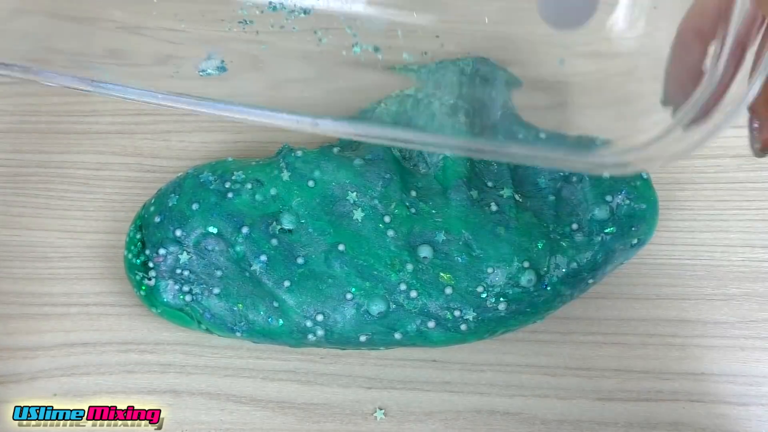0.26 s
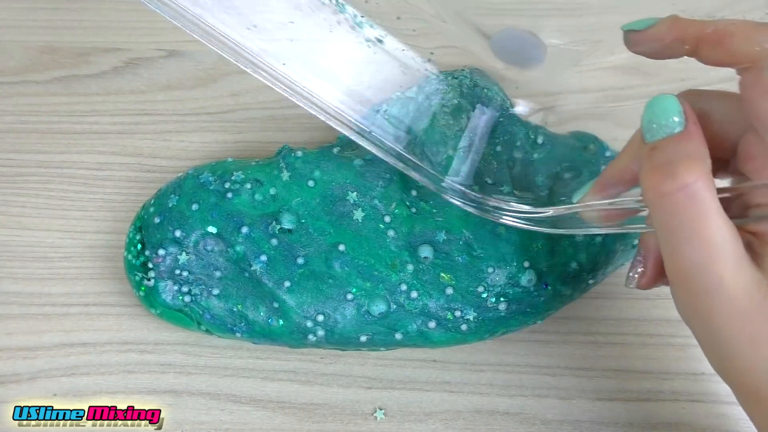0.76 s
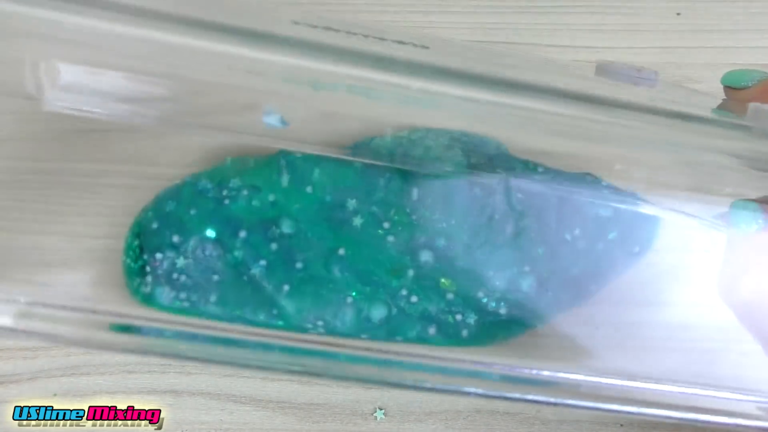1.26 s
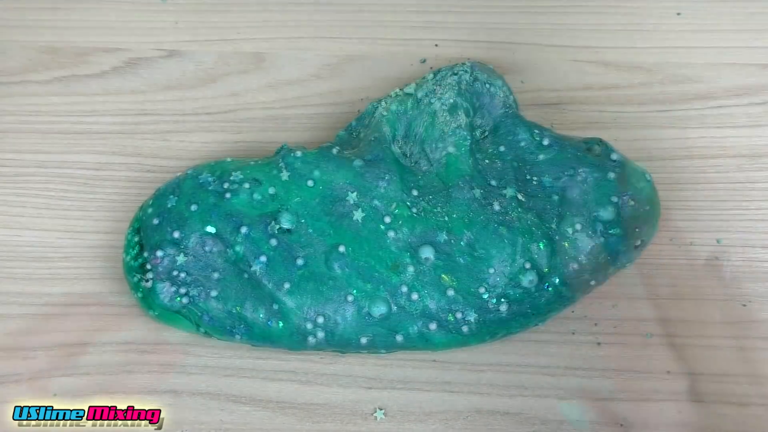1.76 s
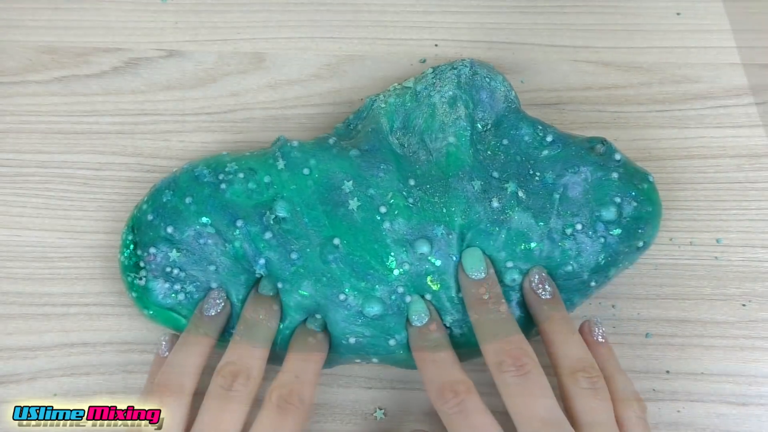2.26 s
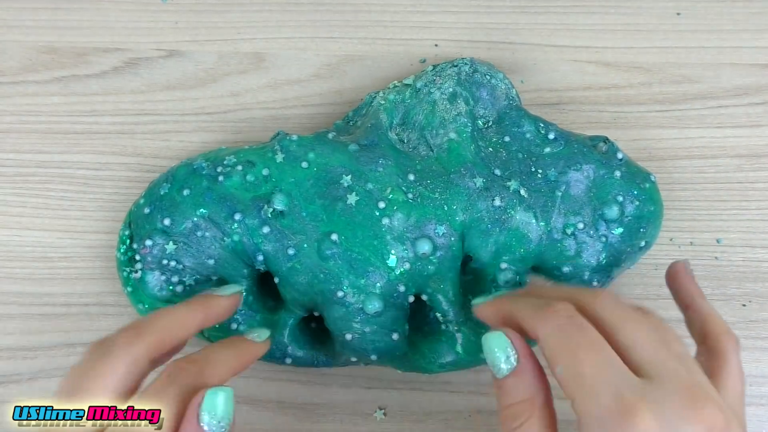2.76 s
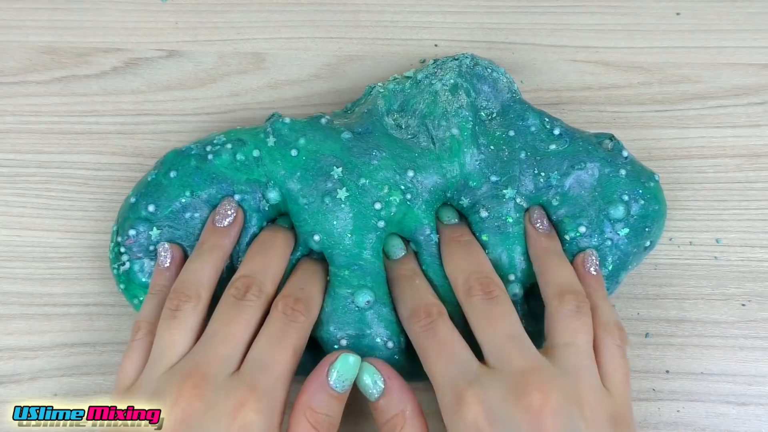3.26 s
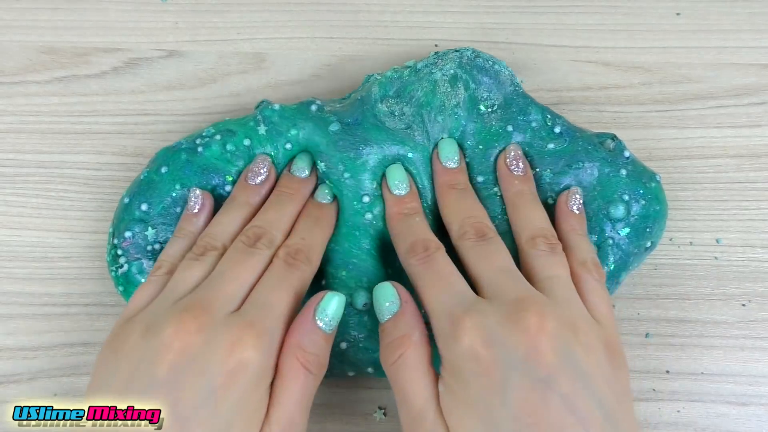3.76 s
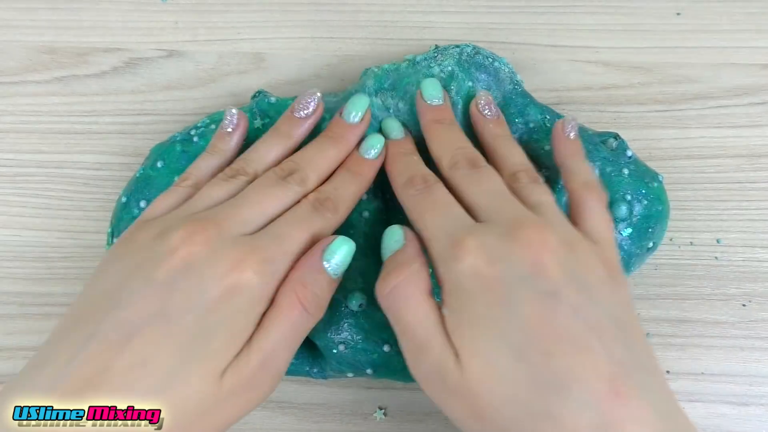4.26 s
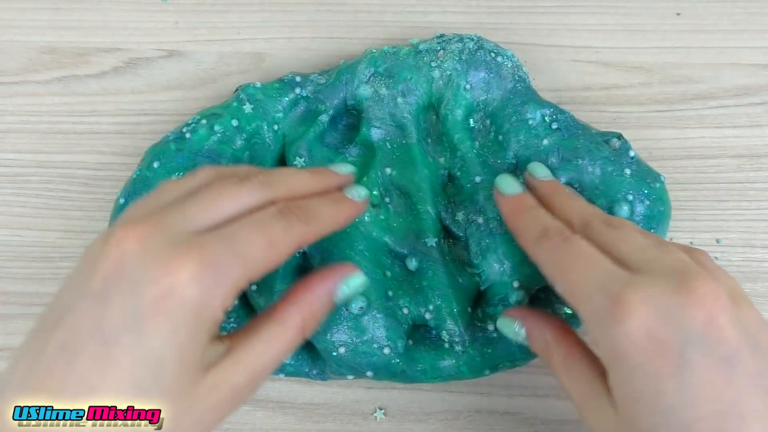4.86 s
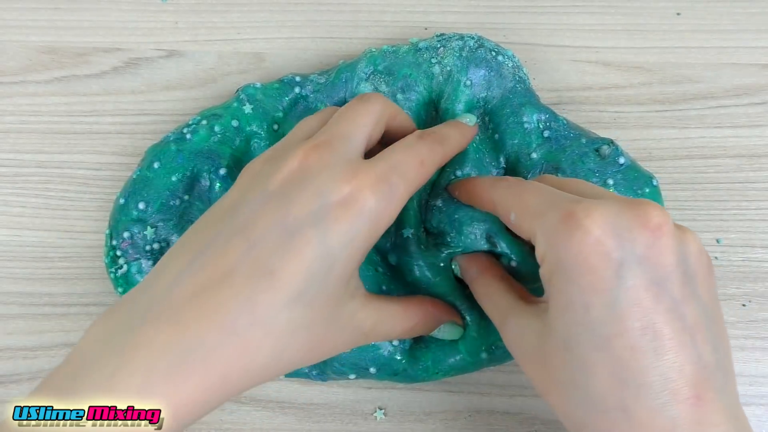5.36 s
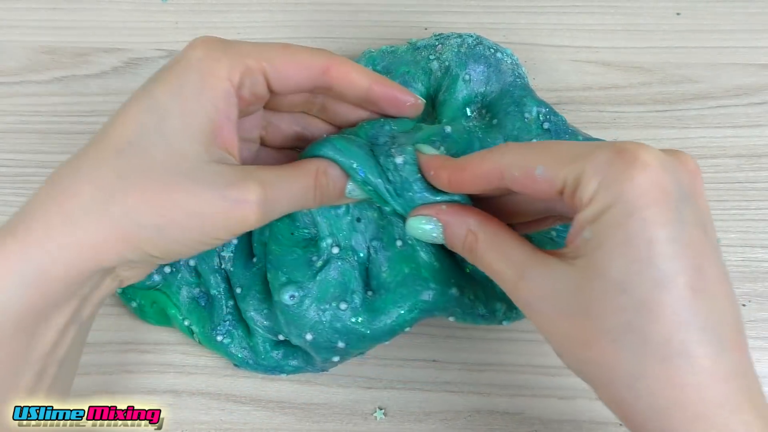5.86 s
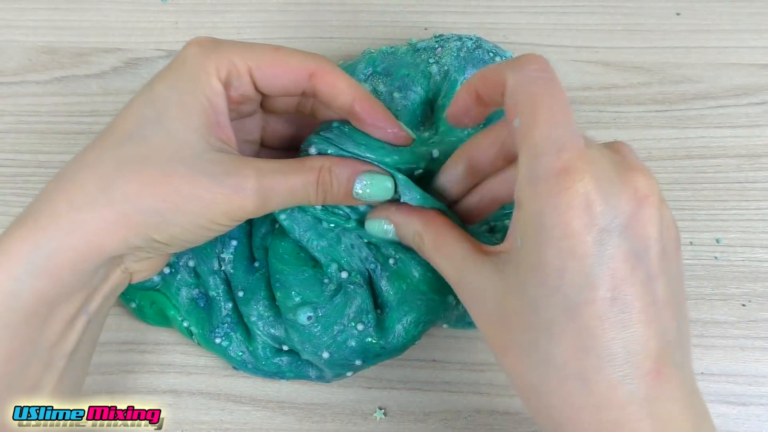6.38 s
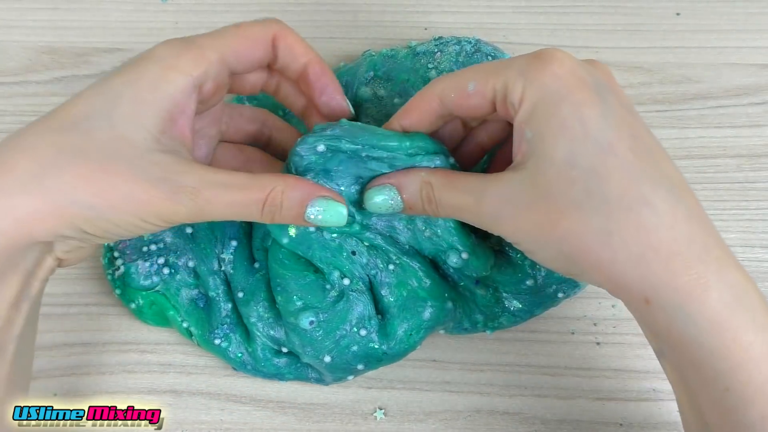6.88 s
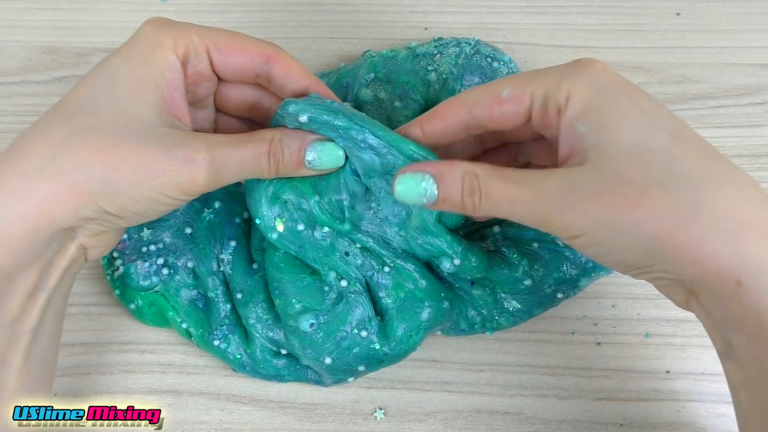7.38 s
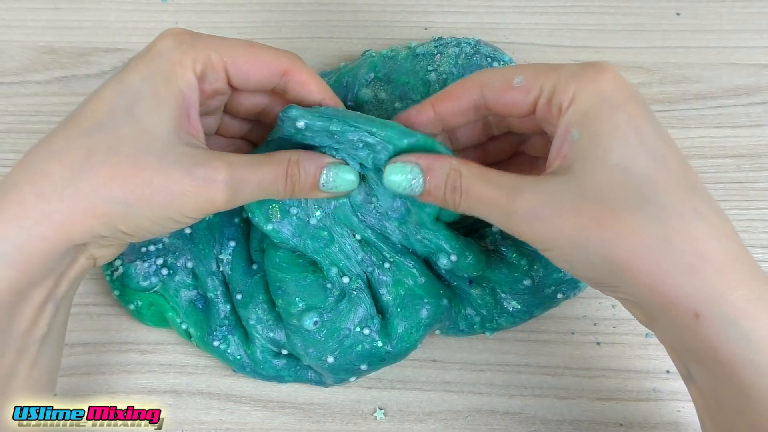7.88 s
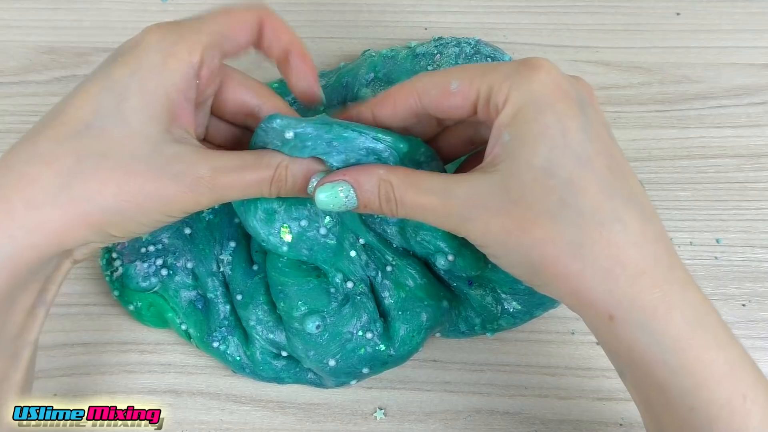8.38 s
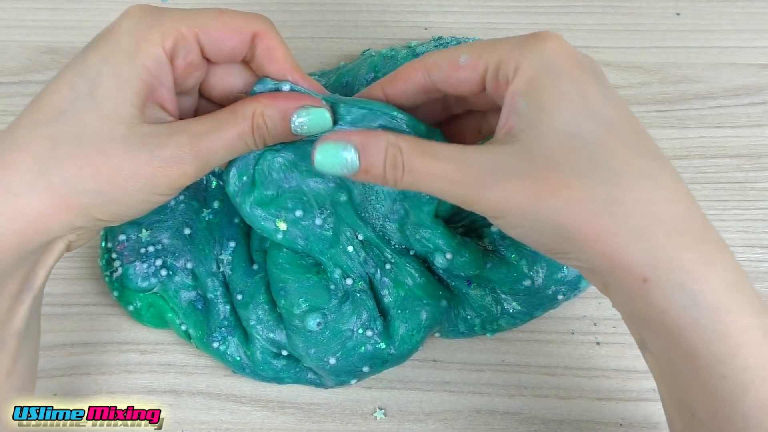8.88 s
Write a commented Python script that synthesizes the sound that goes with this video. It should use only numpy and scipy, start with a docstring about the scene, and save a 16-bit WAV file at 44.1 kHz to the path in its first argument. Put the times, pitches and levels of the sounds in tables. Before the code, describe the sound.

Close to a stereo microphone in a small quiet room, two hands knead slime on a wooden table. After an opening pop and soft knock, a glass dish is tapped in two short ringing clusters. Then come uneven bursts of high, snapping air bubbles, quiet wet squelches and sticky crackles, with dull table bumps beneath that thin out toward the end. Faint hiss and a low hum lie underneath.

```python
"""A small quiet room, where two hands knead sticky slime on a wooden table close to a stereo microphone.
A tapped glass dish rings in its normal modes. As fingers press in and peel out, air pockets burst and
resonate, the sticky skin crackles as it lets go, and a closing cavity gurgles with falling pitch.
The table top thuds under the blows and sways under the pushes. Room hiss and a hum lie below."""
import sys
import numpy as np
from scipy import signal
from scipy.io import wavfile

SR = 44100
rng = np.random.default_rng(int(sys.argv[2]) if len(sys.argv) > 2 else 0)


def generate_wav(signal):
    """Clip the signal to [-1, 1] and save it as 16-bit WAV at the path in sys.argv[1]."""
    frames = np.transpose(np.atleast_2d(signal))
    scaled = np.clip(frames, -1, 1) * 32767
    pcm = np.round(scaled).astype(np.int16)
    wavfile.write(sys.argv[1], SR, pcm)


N = 402633

# spectrum of the hiss: f/Hz, relative spectral level/dB
HISS_SPECTRUM = [(15, -36), (25, -3.5), (149, -0.5), (206, -7.5), (344, 0.5), (607, -21), (714, -14),
                 (1190, -9), (1560, -8), (1840, -10.5), (2840, -11.5), (6050, -26), (10400, -20.5),
                 (13200, -19), (16000, -26)]
# likeness of the hiss at left and right: f/Hz, correlation/1
HISS_CORRELATION = [(30, 0.59), (250, 0.82), (1000, 0.19), (6000, 0.44), (14000, 0.96)]
# envelope of the hum: t/s, level/dB
HUM_ENVELOPE = [(0.0, -62.5), (0.46, -71), (3.38, -71.5), (3.58, -62), (3.79, -74.5), (9.13, -83)]
# bursting air pockets: t/s, level/dB, nominal f/Hz, ring length/cycles, snap re ring/dB
AIR_POCKETS = [(0.0004, -19.5, 3500, 1.4, -13), (0.0571, -21.5, 11700, 2.9, -20),
               (0.205, -50.5, 4200, 1.5, -8), (1.5636, -45, 14200, 7.5, -8),
               (2.3932, -34.5, 10400, 2.5, -21), (2.4596, -43.5, 8660, 2.4, -8),
               (2.4747, -40, 7900, 2, -13), (2.5643, -21.5, 4770, 1.16, -12), (2.7791, -27, 5440, 1.6, -10),
               (2.797, -30, 10800, 4.4, -14), (2.8045, -24.5, 4000, 2.8, -17),
               (2.8123, -28, 3500, 2.7, -18), (2.8545, -17, 9700, 2.4, -4.5),
               (3.0552, -52.5, 2230, 3.2, -12), (3.142, -47.5, 6000, 1.4, -10),
               (3.2263, -44, 3900, 4.4, 16), (3.261, -41.5, 11750, 2.8, 5), (3.2848, -38.5, 11990, 1.8, -5),
               (3.349, -32, 10600, 2.3, -15), (3.519, -12, 7900, 1.25, -16), (3.5421, -33, 9500, 2.1, -9),
               (3.5599, -26.5, 11400, 3, 3), (3.7345, -40.5, 10870, 1.4, -2),
               (3.8425, -26.5, 13300, 2.4, -1.5), (4.1651, -19.5, 10700, 2.2, -3),
               (4.1821, -16.5, 9400, 2.7, -6.5), (4.437, -37.5, 2850, 1.6, -10),
               (4.5762, -33, 1420, 1.3, 14.5), (4.7644, -40, 9950, 3.5, 9), (4.8231, -22.5, 7730, 2.5, -13),
               (5.219, -34, 13000, 2.7, -14), (5.2353, -21, 10760, 10, -33), (5.3033, -37, 11710, 2.1, -4),
               (5.522, -40.5, 3490, 2.5, -14), (5.5453, -46.5, 3500, 4.5, -4),
               (5.6153, -37.5, 9900, 2.5, 8.5), (5.6335, -35, 9000, 3.7, -7),
               (5.673, -16.5, 11040, 90, -17), (5.772, -40.5, 3860, 5.8, 15),
               (5.8094, -27.5, 2530, 0.75, -10.5), (6.022, -48, 1640, 5.4, -15),
               (6.0344, -35.5, 2730, 5.9, -21), (6.035, -38, 1700, 4.4, -18), (6.0356, -9, 10100, 4.7, -18),
               (6.1609, -45, 2340, 2.3, 3), (6.3028, -43, 3560, 2, 0), (6.3356, -29, 9400, 1.26, 0.5),
               (6.4836, -32.5, 4220, 0.88, -12), (6.531, -36.5, 4430, 0.93, 4),
               (6.803, -44.5, 2500, 2.5, 12), (7.084, -44.5, 6000, 1.2, -8), (7.1463, -45, 2400, 1.5, 10.5),
               (7.275, -45, 8480, 1.6, 4), (7.576, -51.5, 2160, 1.8, 14), (8.4168, -41.5, 9010, 2.3, 2),
               (8.556, -35, 3370, 1.3, -4), (8.7368, -44, 3320, 2.5, 17.5), (8.749, -44, 4500, 1.3, 2),
               (8.8783, -24.5, 9840, 1.3, 6), (8.9106, -20, 6070, 1.6, -18), (8.957, -18, 6100, 1.76, -7.5)]
# skin peeling off fingers and table: loudest t/s, level/dB, swell/s, fade/s, fizz re squelch/dB
SKIN_PEELS = [(0.003, -52, 0.011, 0.16, -10.5), (2.47, -77, .1, 0.06, 1), (2.778, -55, 0.01, 0.042, 11.5),
              (2.812, -45, 0.045, 0.065, -4), (3.25, -68, .2, 0.28, -6.5), (3.506, -52.5, 0.012, .04, 3.5),
              (3.54, -46, 0.048, .09, -4.5), (3.86, -71, 0.058, 0.95, -1),
              (4.188, -46.5, 0.054, 0.068, -2.5), (4.574, -68.5, .005, 0.2, -7),
              (4.77, -54.5, 0.054, 0.045, 2), (4.828, -63, .06, 0.064, 4),
              (5.134, -70.5, 0.054, 0.062, -3.5), (5.3, -67, 0.18, 0.36, -7), (5.52, -70, 0.1, .09, -23),
              (5.68, -54.5, .1, 0.1, -3.5), (5.87, -55, 0.28, 0.34, -2.5), (6.488, -58.5, 0.095, 0.078, 1),
              (6.809, -55, 0.024, 0.099, -5), (6.927, -56.5, 0.038, 0.08, -7),
              (7.333, -62.5, 0.13, 0.041, -1.5), (7.597, -58.5, .03, 0.017, -1),
              (7.985, -70, 0.047, 0.077, 5.5), (8.578, -60.5, 0.071, 0.11, -1.5),
              (8.895, -59.5, 0.05, 0.029, 2)]
# slime slapping and pulling the table top: t/s, deep-mode level/dB, upper-mode level/dB
TABLE_BLOWS = [(.002, -49.5, -52), (0.827, -74, -55), (2.343, -79, -53), (2.376, -85, -62),
               (2.566, -93, -56.5), (2.779, -61, -53.5), (2.803, -38, -46.5), (2.862, -60, -49.5),
               (3.521, -47.5, -44.5), (3.545, -53, -46.5), (3.575, -48, -48.5), (4.183, -54, -45),
               (4.21, -51, -47.5), (4.576, -83, -59.5), (4.809, -52.5, -51.5), (4.87, -58, -62.5),
               (5.119, -54.5, -72), (6.067, -57.5, -79), (6.494, -69, -69), (6.993, -58, -52.5)]
# normal modes of the table top: f/Hz, relative level/dB, T60/s
TABLE_MODES = [(119, -4, .17), (80, -8, .1), (210, -14, .06), (297, 3, .1), (345, 0, .08), (400, -4, .07),
               (490, -7, .06), (720, -14, .04), (1100, -15, .03)]
# taps on the glass dish: t/s, level/dB, hardness as spectral slope/(dB per octave)
DISH_TAPS = [(0.8016, -42.5, -3.5), (0.816, -44.5, -7), (0.8277, -31, -3), (1.7368, -44, -10.5),
             (1.8488, -25.5, -5), (1.8945, -26.5, 6), (1.906, -19.5, 1)]
# normal modes of the dish: f/Hz, relative level/dB
DISH_MODES = [(1367, -11), (1800, -17), (1916, -15), (2273, -10), (2520, -11), (2790, -14), (3035, -9),
              (3144, -9), (3250, -12), (3537, -9), (3878, -3), (4194, -8), (4307, -11), (4474, -10),
              (4678, -8), (4867, -14), (5490, -14), (6205, -7), (6334, -6), (6410, -6), (7068, -14),
              (7284, -9), (7499, -7), (7650, -10), (7883, -8), (8371, -9), (8599, -4), (8690, -7),
              (8772, -7), (9598, -16), (10230, -16), (11200, -15), (11500, -14)]
# pushes that rock the table: strongest t/s, level/dB, swell/s
TABLE_PUSHES = [(2.38, -53, 0.17), (2.89, -66, 0.11), (3.35, -63, 0.2), (3.89, -61, .19),
                (4.41, -64.5, 0.17), (4.9, -58, 0.14), (6.4, -68, 0.086)]
# reverberation of the room: f/Hz, T60/s, tail level re direct sound/dB
ROOM_DECAY = [(291, .2, 15.5), (1550, 0.25, 2), (4000, 0.19, 3.5), (9430, 0.21, 0.5), (13900, 0.26, -1.5)]

LEFT_RIGHT = np.array([[1], [-1]])   # opposite signs for the two channels


def from_db(db):
    """Amplitude ratio of a level in decibels."""
    return 10 ** (np.asarray(db) / 20)


def unit_rms(x):
    """Normalisation to an rms of 1."""
    return x / np.sqrt(np.mean(x ** 2) + 1e-20)


def at_hz(spectrum, hz, column=1):
    """Interpolation of a table column on a logarithmic frequency axis."""
    rows = np.array(spectrum)
    return np.interp(np.log(hz), np.log(rows[:, 0]), rows[:, column])


def band(x, low_hz, high_hz):
    """Butterworth band-pass filter."""
    sos = signal.butter(2, [low_hz, min(high_hz, .45 * SR)], "band", fs=SR, output="sos")
    return signal.sosfilt(sos, x)


def resonance(x, hz, width_hz):
    """Forced response of a resonator with a peak gain of 1."""
    r = np.exp(-np.pi * width_hz / SR)
    feedback = [1, -2 * r * np.cos(2 * np.pi * hz / SR), r * r]
    return signal.lfilter([(1 - r * r) / 2, 0, (r * r - 1) / 2], feedback, x)


def ring(impulses, hz, t60):
    """Free vibration of a damped mode: a unit impulse starts a decaying sine of amplitude 1."""
    r, w = 10 ** (-3 / (t60 * SR)), 2 * np.pi * hz / SR
    return signal.lfilter([0, np.sin(w)], [1, -2 * r * np.cos(w), r * r], impulses + 1e-18)


def drift(per_s):
    """Slow random modulation: straight lines between standard normal values."""
    knots = rng.standard_normal(int(N / SR * 60) + 2)
    return np.interp(np.arange(N) * per_s / SR, np.arange(len(knots)), knots)


def stereo(mid, side, correlation):
    """Sum and difference of two independent signals give partly correlated channels."""
    return (np.sqrt(1 + correlation) * mid + np.sqrt(1 - correlation) * side * LEFT_RIGHT) / np.sqrt(2)


def hump(peak_s, db, swell_s, fade_s, roundness, edge_db=20):
    """Envelope, edge_db down at swell_s before and fade_s after its peak; roundness 1 is a cusp, 2 a bell."""
    t = np.arange(N) / SR - peak_s
    distance = np.abs(t / np.where(t < 0, swell_s, fade_s))
    return from_db(db - edge_db * distance ** roundness)


def hiss():
    """Partly coherent broadband noise, whose level flickers slightly in each band."""
    out, white = 0, rng.standard_normal((2, 2, N))
    edges = 22 * 2 ** np.arange(0, 9.9, .45)
    for k, (low, high) in enumerate(zip(edges, edges[1:])):
        hz = np.sqrt(low * high)
        gain = from_db(at_hz(HISS_SPECTRUM, hz) + 2.1 * drift(16))
        out = out + gain * stereo(*band(white[k % 2], low, high), at_hz(HISS_CORRELATION, hz))
    return from_db(-65.5) * unit_rms(out)


def hum(hz=157.9, width_hz=8.6):
    """Narrow-band noise is heard as a wavering tone."""
    white = rng.standard_normal((2, N))
    mid, side = resonance(resonance(white, hz, width_hz), hz, width_hz)
    level_db = np.interp(np.arange(N) / SR, *np.transpose(HUM_ENVELOPE))
    return from_db(level_db) * stereo(unit_rms(mid), unit_rms(side), correlation=0.34)


def pops():
    """Cavity resonance: a bursting pocket rings, rising in pitch as it opens, while its skin snaps."""
    out, t = np.zeros((2, N)), np.arange(1400) / SR
    for start_s, db, hz, cycles, snap_db in AIR_POCKETS:
        noise = rng.standard_normal(len(t))
        rise_s = cycles / hz / 1.92
        age = t / rise_s
        flutter = 1 + .25 * unit_rms(band(noise, 200, 900))
        turns = hz * (1.091 * t - 0.35 * rise_s * (1 - np.exp(-age)))   # pitch climbs and levels off
        tone = age ** 2 * np.exp(2 - 2 * age) * np.sin(2 * np.pi * turns) * flutter
        snap = from_db(snap_db) * (0.25 * np.exp(-t / 0.0015) * noise + 0.461 * (t == 0))
        smack = band(band(snap, 1300, 3566), 1000, 4700)
        tick_db = 0.5 - 11 * max(np.log2(hz / 5000), 0)   # weaker for small, high-pitched pockets
        tick = from_db(tick_db) * band(snap, min(1.5 * hz, 13000), 3.23 * hz)
        fray = from_db(-18) * np.exp(-t / 0.011) * band(noise, hz / 1.34, hz * 1.6)   # threads tear
        pan_db = 0.395 * noise[-1] * LEFT_RIGHT
        pop = from_db(db + pan_db) * (tone + smack + tick + fray)
        start = round(start_s * SR)
        out[:, start:start + len(t)] += pop[:, :N - start]
    return out


def crackle(low_hz, high_hz, per_s, cycles, tilt_db, pitches):
    """Shot noise: clustered impulses of uneven size excite damped resonators; tilt_db is per octave."""
    sizes = from_db(3.8 * np.minimum(rng.exponential(1, N), 4)) * rng.choice([-1, 1], N)
    occurs = rng.random(N) < per_s * from_db(4 * drift(55)) / SR
    pitch_index = rng.integers(0, pitches, N)
    out = 0
    for k, hz in enumerate(np.geomspace(low_hz, high_hz, pitches)):
        snaps = resonance(sizes * occurs * (pitch_index == k) + 1e-18, hz, hz / cycles)
        snaps = unit_rms(resonance(snaps, hz, 2 * hz / cycles))
        out = out + from_db(tilt_db * np.log2(hz / low_hz)) * snaps
    return unit_rms(out)


def peeling():
    """Adhesion fails in many tiny snaps: a wet squelch, a fine fizz and lone ticks between the peels."""
    squelch_gain, fizz_gain = np.zeros((2, N))
    for peak_s, db, swell_s, fade_s, fizz_db in SKIN_PEELS:
        gain = hump(peak_s, db, swell_s, fade_s, roundness=1.255, edge_db=24.5)
        squelch_gain += gain
        fizz_gain += np.sqrt(2) * gain * from_db(fizz_db)
    squelch = crackle(1200, 4800, per_s=2500, cycles=2.0, tilt_db=3.5, pitches=7)
    fizz = crackle(7000, 13500, per_s=2700, cycles=4.7, tilt_db=2.5, pitches=6)
    ticks = crackle(890, 16000, per_s=39, cycles=1.8, tilt_db=-2.7, pitches=3)
    kneading = np.arange(N) / SR > 2.2
    return squelch_gain * squelch + fizz_gain * fizz + from_db(-82) * kneading * ticks


def soft_contact(rise_s):
    """Force of a soft impact: slime lands as a short rough push of unit energy."""
    t = np.arange(2000) / SR
    return unit_rms(t * np.exp(-t / rise_s) * rng.standard_normal(len(t))) / np.sqrt(len(t))


def table_thuds():
    """Modal vibration of a plate: each blow drives the deep and the upper modes with separate strengths."""
    times, deep_db, upper_db = np.transpose(TABLE_BLOWS)
    starts = np.round(times * SR).astype(int)
    scatter_db = rng.normal(0, 1.0, (len(TABLE_BLOWS), len(TABLE_MODES)))
    deep, upper = np.zeros((2, N))
    for k, (hz, mode_db, t60) in enumerate(TABLE_MODES):
        group, blow_db = (deep, deep_db) if hz < 150 else (upper, upper_db)
        impulses = np.zeros(N)
        impulses[starts] = from_db(blow_db + mode_db + scatter_db[:, k])
        group += ring(impulses, hz, t60)
    swell = resonance(deep, TABLE_MODES[0][0], 67)   # the heavy top takes a few cycles to get moving
    squish = signal.oaconvolve(upper, soft_contact(rise_s=0.0099))[:N]
    thuds = from_db(6) * swell + 0.36 * upper + 0.86 * squish
    left = band(band(thuds, 70.3, 1560), 55, 2200)
    right = signal.lfilter([.45, 1], [1, .45], np.roll(left, 6))   # the far side arrives a little late
    return np.array([left, right])


def dish_taps():
    """Impact excites the normal modes of the glass; harder taps are brighter, higher modes die sooner."""
    times, tap_db, hardness = np.transpose(DISH_TAPS)
    starts = np.round(times * SR).astype(int)
    scatter_db = rng.normal(0, 3.0, (len(DISH_TAPS), len(DISH_MODES)))
    out = np.zeros(N)
    out[starts] = from_db(tap_db - 5)   # the clack of the contact itself
    for k, (hz, mode_db) in enumerate(DISH_MODES):
        tilt_db = hardness * np.log2(hz / 4000)
        impulses = np.zeros(N)
        impulses[starts] = from_db(tap_db + mode_db - 17.5 + tilt_db + scatter_db[:, k])
        out += (-1) ** k * ring(impulses, hz, t60=0.077 * (4000 / hz) ** 0.39)
    return band(out, 900, 15000)


def table_sway(hz=39.3, left_lead_rad=0.27):
    """The table's fundamental mode, nearly a sine, swells and fades with each push."""
    phase = 2 * np.pi * np.cumsum(hz * (1 + .03 * drift(6))) / SR
    gain = sum(hump(peak_s, db, swell_s, fade_s=1.15 * swell_s, roundness=1.1)
               for peak_s, db, swell_s in TABLE_PUSHES)
    balance = from_db(.4 * LEFT_RIGHT)
    return np.sqrt(2) * gain * balance * np.sin(phase + left_lead_rad / 2 * LEFT_RIGHT)


def gurgle(start_s=5.69, length_s=0.29, first_hz=3200, last_hz=780, sink_s=.085):
    """Air sucked into a closing fold excites a cavity resonance: a noise band that glides down, in lumps."""
    lowpass = signal.butter(2, 190, fs=SR, output="sos")   # sets the half-width of the band
    in_phase, quadrature = signal.sosfilt(lowpass, rng.standard_normal((2, N)))
    progress = np.clip((np.arange(N) / SR - start_s) / length_s, 0, 1)
    hz = last_hz + (first_hz - last_hz) * np.exp(-progress * length_s / sink_s)
    phase = 2 * np.pi * np.cumsum(hz) / SR
    cavity = unit_rms(in_phase * np.cos(phase) + quadrature * np.sin(phase))
    envelope = np.minimum(progress / .55, 1) ** .5 * (1 - progress ** 3)
    lumps_db = 3.5 * drift(55)
    return envelope * from_db(-57 + lumps_db) * cavity


def room(x, echo_s=0.0019, echo_db=-15.5):
    """Reverberation: direct sound, a reflection off the table and a tail decaying exponentially by band."""
    t, response = np.arange(SR // 2) / SR, 0
    noise = stereo(*rng.standard_normal((2, len(t))), correlation=0.7)
    edges = 120 * 2 ** np.arange(0, 7.6, .5)
    for low, high in zip(edges, edges[1:]):
        hz = np.sqrt(low * high)
        t60, tail_db = at_hz(ROOM_DECAY, hz), at_hz(ROOM_DECAY, hz, column=2)
        unit_energy = np.sqrt(2 * np.log(1000) / (t60 * SR))
        response = response + from_db(tail_db - 60 * t / t60) * unit_energy * band(noise, low, high)
    response *= np.clip(t / 0.001 - .5, 0, 1)   # the tail sets in just after the direct sound
    response[:, 0] += 1
    response[:, round(echo_s * SR)] += from_db(echo_db)
    return signal.oaconvolve(x, response, axes=1)[:, :N]


def scene():
    """Superposition: slime and dish reverberate; thuds, sway, hum and hiss reach the microphone directly."""
    thuds = table_thuds()
    reverberant = room(pops() + peeling() + dish_taps() + gurgle())
    return hiss() + hum() + reverberant + thuds + table_sway()


def record(dry):
    """Band limiting: a steep low-pass filter removes the treble above 16.4 kHz."""
    return signal.sosfilt(signal.cheby2(16, 60, 16400, fs=SR, output="sos"), dry)


dry = scene()
out = record(dry)
generate_wav(out)
```